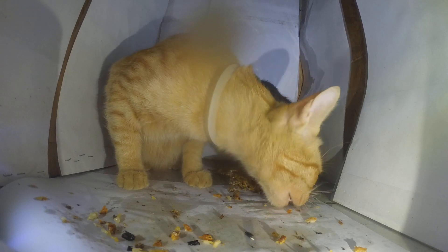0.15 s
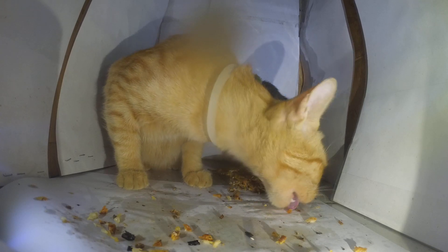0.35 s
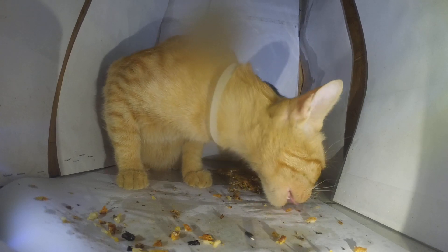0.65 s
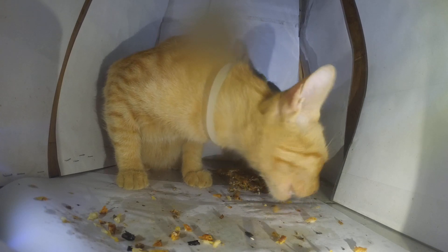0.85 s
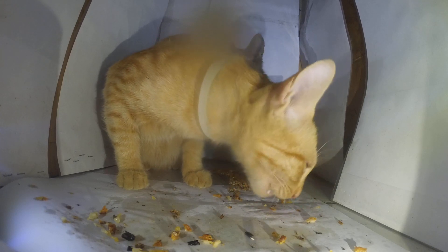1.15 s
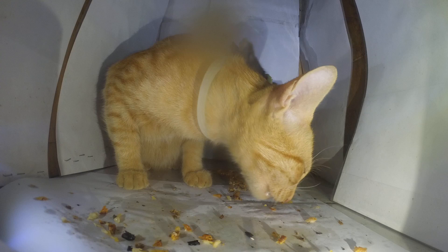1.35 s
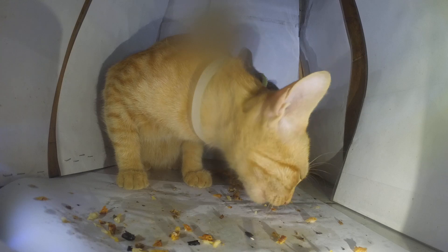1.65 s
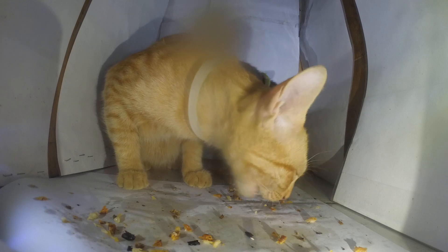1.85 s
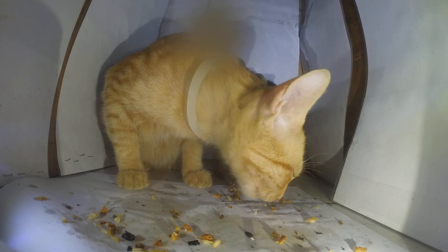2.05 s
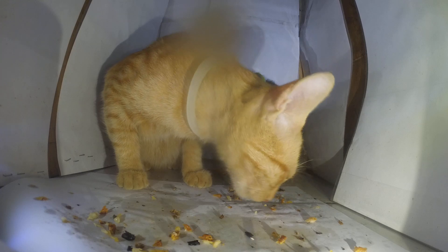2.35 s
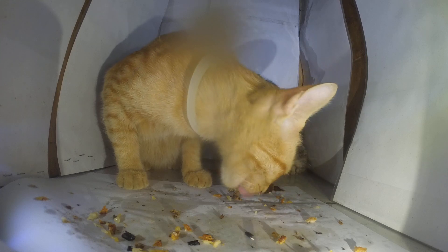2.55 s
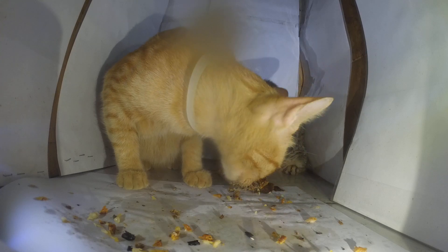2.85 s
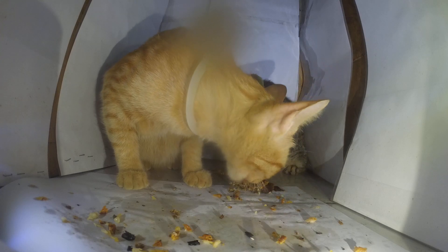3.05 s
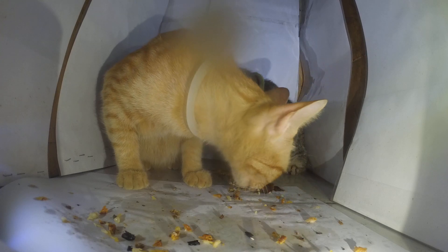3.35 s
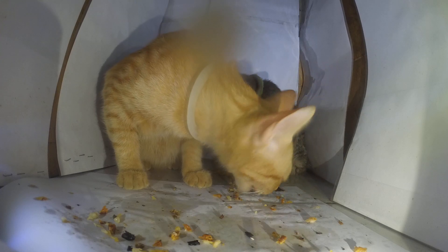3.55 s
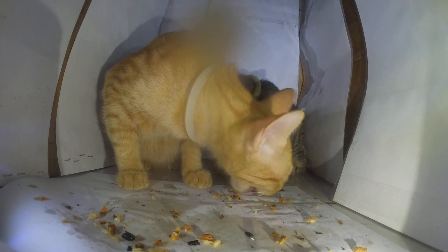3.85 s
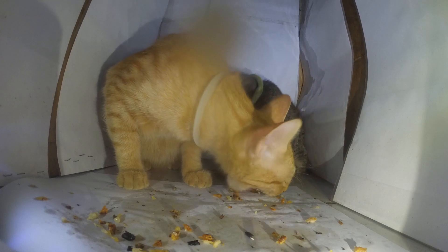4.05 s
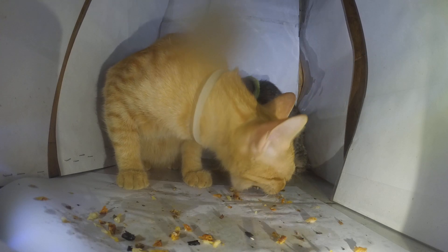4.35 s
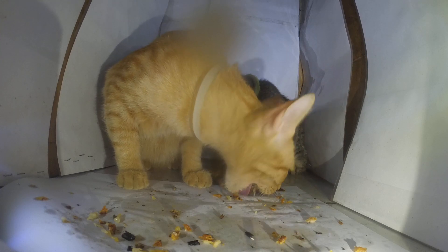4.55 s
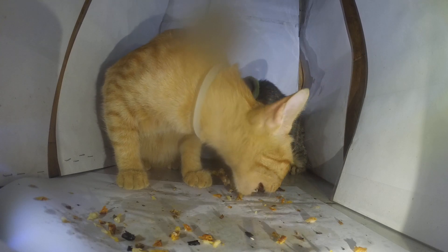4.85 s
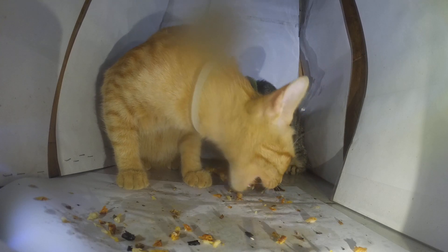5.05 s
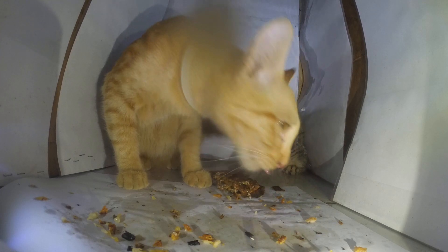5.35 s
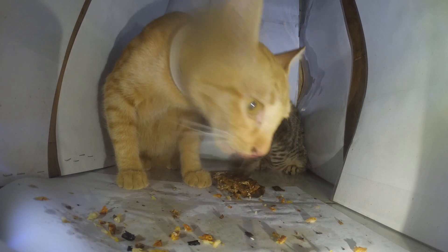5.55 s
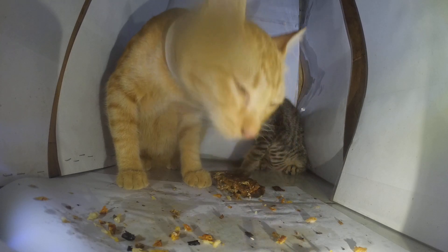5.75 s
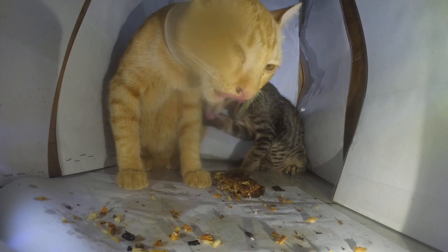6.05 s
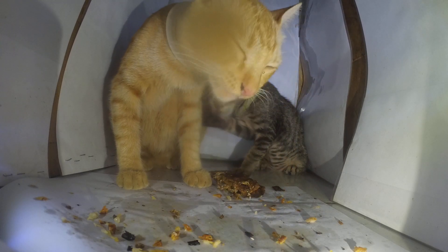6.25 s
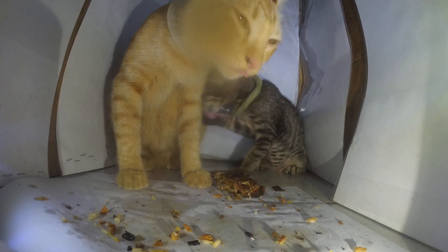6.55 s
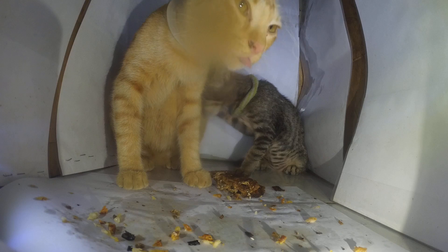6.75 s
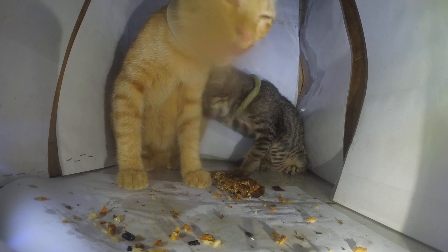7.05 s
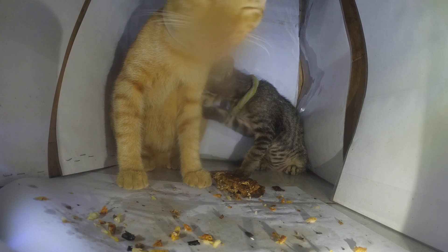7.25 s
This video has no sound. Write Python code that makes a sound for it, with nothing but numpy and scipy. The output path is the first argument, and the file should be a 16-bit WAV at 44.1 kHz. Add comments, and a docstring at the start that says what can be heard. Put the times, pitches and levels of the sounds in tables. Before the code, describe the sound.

A cat eats from the floor of a small box, close to a single microphone, with the same sound in both channels. From the start a deep hum, traffic rumble, faint hiss and high, rapidly throbbing insect shrill lie underneath. A crisp click snaps at about 0.5 seconds; from 1 to 3.5 seconds wet clicks and hollow smacks come in irregular clusters, busiest around 1.2 and 2 seconds, with short boxy reflections. A faster motor climbs in pitch until fading around 5.5 seconds, while a slower growl enters near 0.7, grows stronger and later sinks. Chewing thins after 3.5 seconds to tiny crackles and fine ticks, several between 5 and 5.5. Road roar swells to a peak around 5.5, then eases. At about 6.2 seconds a quick wet lick slides in pitch with a smack. Another low motor joins from 6 to 7.2, with sparse final clicks near 7.1.

```python
"""A cat eats from the floor of a small feeding box: short noise bursts and gliding tones click, smack and lick.
Motors growl past outside as stacks of sines: a slow one falls in pitch, a faster one speeds up, one joins late.
Shaped noise makes the road roar that swells behind them, and a faint hiss.
Insects shrill and throb high up as noise in sharp resonances; a very low hum stands under everything.
One microphone hears it all, so both channels are the same."""
import sys
import numpy as np
from scipy import signal
from scipy.fft import rfft, irfft
from scipy.io import wavfile
from scipy.ndimage import uniform_filter1d

SR = 44100
rng = np.random.default_rng(int(sys.argv[2]) if len(sys.argv) > 2 else 0)


def digitize_waveform(pressure):
    """Quantize a signal to 16-bit integers and store it at the path in sys.argv[1].

    Rows of a 2-D input are taken as channels; values are limited to [-1, 1].
    """
    field = np.atleast_2d(pressure).T
    bounded = np.clip(field, -1, 1)
    quanta = np.round(bounded * 32767).astype(np.int16)
    wavfile.write(sys.argv[1], SR, quanta)


N = 326781   # length in samples

# Very low hum. Each row: time in seconds, pitch in Hz, level in dB.
HUM_CURVE = [(0, 22.06, -45.5), (1.4, 22.54, -47), (3.2, 22.3, -51), (3.9, 21.54, -41), (5.7, 22.2, -61.5),
             (6.5, 21.92, -43), (6.85, 22.2, -44), (7.41, 22.25, -45)]
# Passing traffic. Each row: time in seconds, tyre roar in dB, rumble in dB, deep drone in dB.
ROAD_LEVELS = [(0, -67, -56, -48), (.9, -68.5, -56, -44.5), (1.45, -68, -56, -51.5), (2.0, -67, -56.5, -45),
               (2.55, -65.5, -54, -45.5), (3.2, -63.5, -54.5, -48), (4.1, -61, -48.5, -46.5),
               (4.6, -59.5, -53, -44), (5.1, -57.5, -53, -48.5), (5.5, -57, -54, -41),
               (5.75, -57, -53.5, -51), (6.15, -61.5, -52, -45), (6.8, -60.5, -53, -47),
               (7.41, -61.5, -49.5, -44)]
# Colour of the deep drone. Each row: frequency in Hz, relative strength in dB per Hz.
DRONE_COLOUR = [(3, -12), (10, -3), (30, -1.5), (60, 0), (100, -4), (140, -5.5), (200, -6.5), (240, -9),
                (300, -27)]
# Colour of the rumble. Each row: frequency in Hz, relative strength in dB per Hz.
RUMBLE_COLOUR = [(150, -7), (210, 0.5), (260, -1), (350, 2), (420, -0.5), (480, -9.5), (570, -7),
                 (700, -16.5), (900, -31)]
# Colour of the tyre roar. Each row: frequency in Hz, relative strength in dB per Hz.
TYRE_COLOUR = [(350, -29), (600, 0.5), (801, 0.5), (874, -3.5), (1090, 4), (1260, -1.5), (1510, -1),
               (2750, -11.5), (3180, -10), (4670, -17), (6000, -24.5), (7800, -44.5), (13200, -120)]
# Colour of the faint hiss. Each row: frequency in Hz, relative strength in dB per Hz.
HISS_COLOUR = [(1500, -20), (2200, -4.5), (5000, -3.5), (8000, -6), (10000, -8.5), (12500, -10),
               (15600, -14.5)]
# Insect songs. Each row: pitch in Hz, width in Hz, level in dB, throb depth in dB (below 0: swells as others dip).
INSECT_SONGS = [(6673, 360, -72.5, 2), (6977, 430, -67.5, 4.5), (7120, 1100, -72, -0.5),
                (7513, 180, -74, -1.5), (5810, 570, -82, 6), (8070, 3800, -89, 10)]
# Throb of the chorus. Each row: time in seconds, number of throbs so far.
THROB_COUNT = [(0, -.04), (5.3, 50.02), (5.7, 53.62), (7.41, 69.68)]
# Slow near motor. Each row: time in seconds, firing rate in Hz, then levels of orders 1, 2, 3, 4, 5 in dB.
# Order k is the tone at k times the firing rate.
NEAR_MOTOR_CURVE = [(0.7, 42.8, -70, -56, -66, -59, -63), (1.16, 40.74, -55, -49, -63, -52, -48),
                    (1.55, 39.35, -53, -57, -61, -56, -70), (1.8, 39.21, -51.5, -66, -60, -46, -49.5),
                    (2.1, 39.31, -63, -54, -58, -51.5, -51), (2.45, 39.5, -47, -54, -66, -68, -56),
                    (2.68, 39.85, -50, -51, -70, -67, -50.5), (2.84, 40.18, -52, -62, -74, -40.5, -45.5),
                    (3.1, 40.59, -47, -53.5, -52, -46, -52), (3.5, 41.02, -48, -45.5, -50, -41, -38),
                    (3.9, 40.54, -54, -42, -61, -40, -49.5), (4.2, 39.63, -43, -47, -46.5, -40, -48.5),
                    (4.45, 39.67, -43.5, -46.5, -57, -54, -36.5), (4.9, 39.54, -40, -45.5, -53, -42.5, -38),
                    (5.12, 39.2, -42, -46.5, -40, -55, -38), (5.35, 38.9, -45, -42.5, -48, -37.5, -43),
                    (5.75, 38.32, -41.5, -44.5, -54, -51, -39.5),
                    (6.15, 37.83, -44.5, -44.5, -50, -51, -46), (6.35, 37.9, -44, -55, -48.5, -45.5, -48),
                    (6.65, 37.3, -46, -57, -46, -54, -49), (6.95, 37.26, -47, -49, -48, -43.5, -41),
                    (7.1, 36.8, -54, -52, -34.5, -49, -49), (7.26, 35.4, -57, -53, -39.5, -47.5, -46),
                    (7.41, 36, -50, -41, -40, -39, -42.5)]
# High orders of the near motor. Each row: order (a plain number), level against the fifth order in dB.
NEAR_HIGH_ORDERS = [(6, -16), (7, -26), (8, -24), (9, -20), (10, -25), (11, -30), (14, -32), (19, -36)]
# Faster motor. Each row: time in seconds, firing rate in Hz, then levels of orders 2, 3, 4 in dB.
FAST_MOTOR_CURVE = [(0, 46.46, -56, -51, -44), (.3, 46.18, -51, -55, -55.5),
                    (.75, 46.06, -55.5, -48.5, -54.5), (1.1, 48.93, -52, -54, -59),
                    (1.4, 50.46, -51.5, -50, -55), (1.6, 51.6, -61, -52.5, -55), (2.0, 52.4, -47, -52, -56),
                    (2.4, 53.2, -46, -53.5, -57), (2.6, 54, -49.5, -41.5, -51),
                    (2.95, 55.3, -40, -53.5, -51), (3.25, 56.1, -58, -45.5, -60),
                    (3.55, 57.2, -46, -48, -66), (3.9, 57.6, -57, -50, -67), (4.3, 58.1, -52, -46.5, -72),
                    (4.7, 58.7, -49.5, -53, -48), (5.05, 59.13, -61, -50.5, -65),
                    (5.4, 59.3, -59, -56, -60)]
# High orders of the faster motor. Each row: order (a plain number), level against the fourth order in dB.
FAST_HIGH_ORDERS = [(7, -17), (8, -17), (10, -20)]
# Motor that joins late. Each row: time in seconds, firing rate in Hz, level in dB.
LATE_MOTOR_CURVE = [(6.0, 40.1, -54), (6.3, 40.13, -47), (6.9, 40.5, -38.5), (7.05, 39.23, -48),
                    (7.2, 40.6, -70)]
# Orders of the late motor. Each row: order (a plain number), level against the curve above in dB.
LATE_MOTOR_ORDERS = [(2, 0.5), (4, -14.5), (5, -17)]
# Mouth clicks. Each row: start in seconds, energy in dB, centre in Hz, width in octaves.
MOUTH_CLICKS = [(0.4313, -46, 5870, .4), (0.5414, -20, 5400, 1.03), (0.679, -38, 4000, 1.2),
                (0.9982, -36.5, 3900, 0.44), (1.261, -38, 4600, .95), (1.278, -41, 4480, 1.1),
                (1.305, -40, 4700, 0.94), (1.6344, -40, 4100, 1.4), (1.81, -39.5, 4900, .9),
                (1.9544, -44, 3950, 1.4), (1.9878, -27.5, 4450, 0.65), (2.023, -33.5, 3800, 1.2),
                (2.5112, -46, 3900, .9), (2.533, -40, 4200, 1.2), (3.007, -33, 3190, 1.35),
                (3.0188, -41, 4054, 1.07), (3.0554, -41, 3600, 0.68), (3.1187, -43, 3580, .75),
                (3.5204, -43, 3742, .95), (5.0582, -35, 4960, 1.1), (5.5403, -39, 5424, .45),
                (5.8086, -36, 3870, 1.33), (6.0088, -36, 3000, 1.7), (6.566, -39, 3000, 0.46),
                (7.0674, -37, 5463, 0.5), (7.1082, -41, 5300, .4)]
# Hollow smacks in the box. Each row: start in seconds, peak in dB, centre in Hz.
HOLLOW_SMACKS = [(0.5414, -59, 2210), (1.0001, -56, 1880), (1.1283, -53, 1868), (1.1957, -57, 1840),
                 (1.2448, -60, 1870), (1.2625, -49, 1720), (1.278, -56, 1620), (1.6566, -54, 1800),
                 (1.8846, -54.5, 1520), (1.955, -54, 1889), (1.9884, -45.5, 1750), (2.0228, -51.5, 1670),
                 (2.5117, -55, 1664), (2.7377, -57, 1870), (2.832, -54.5, 1850), (3.0076, -57, 1860),
                 (3.1807, -58, 1940), (3.1961, -54, 1830), (3.2091, -56, 1800), (3.2331, -57, 1933),
                 (3.5199, -51.5, 1962), (6.1724, -49, 1520)]
# Fine high ticks. Each row: start in seconds, peak in dB, centre in Hz.
HIGH_TICKS = [(0.5407, -59, 9820), (1.1255, -57, 9820), (1.8113, -61, 9200), (2.9596, -64, 9200),
              (3.3822, -63, 9140), (4.1782, -59, 10060), (4.2418, -61, 8927), (5.0575, -56, 8810),
              (5.1676, -59, 9600), (5.3657, -55, 8700), (5.4105, -57, 9270), (5.4241, -52, 9020),
              (6.1724, -62, 9100)]
# Wet licks. Each row: start in seconds, level in dB, start pitch in Hz, end pitch in Hz, glide time in seconds.
WET_LICKS = [(6.168, -42.5, 3766, 4116, 0.0065), (6.1695, -43, 6410, 6670, 0.0038),
             (6.170, -55, 5300, 5400, 0.0037), (6.2615, -45, 4210, 3050, 0.0093),
             (6.265, -56, 2760, 2470, 0.004), (6.290, -64, 3120, 3030, 0.0038)]

HISS_DB = -75.5
STROKE_HZ, STROKE_LIKENESS = 60.5, 0.27   # wing strokes per second; share of each stroke that repeats the last
CLICK_T60_S = 0.011   # time for the click's noise to fall by 60 dB
CUTOFF_HZ = 15600


def from_db(db):
    """Turn a level in dB into a plain gain."""
    return 10 ** (np.asarray(db) / 20)


def rms_one(x):
    """Scale a sound to an average strength (rms) of 1."""
    return x / np.sqrt(np.mean(x ** 2) + 1e-20)


def in_time(rows):
    """Draw straight lines between the rows, giving each column a value at every sample."""
    seconds, *columns = np.transpose(rows)
    t = np.arange(N) / SR
    return [np.interp(t, seconds, column) for column in columns]


def drift(rate_hz):
    """Slow random wandering with rms 1: smoothed noise, worked out at every 40th sample."""
    step = 40
    r = np.exp(-2 * np.pi * rate_hz * step / SR)
    noise = rng.standard_normal(N // step + 2002)
    slow = signal.lfilter([1], [1, -2 * r, r * r], noise)[2000:]   # skip the filter's start-up
    return np.interp(np.arange(N) / step, np.arange(len(slow)), rms_one(slow))


def coloured(spectrum):
    """Noise with the given balance of low and high, rms 1."""
    hz = np.fft.rfftfreq(N, 1 / SR) + 1   # the 1 avoids log(0)
    at_hz, db = np.transpose(spectrum)
    shape_db = np.interp(np.log(hz), np.log(at_hz), db, -80, -80)
    return rms_one(irfft(rfft(rng.standard_normal(N)) * from_db(shape_db), N))


def resonance(x, hz, width_hz):
    """Let through a band around one pitch, like something that rings there."""
    r = np.exp(-np.pi * width_hz / SR)
    top = (1 - r * r) / 2   # keeps the gain at the peak near 1
    return signal.lfilter([top, 0, -top], [1, -2 * r * np.cos(2 * np.pi * hz / SR), r * r], x)


def wavering_orders(rows, orders, upper, wobble, flutter_db, fading_db):
    """Sines at multiples of one moving pitch, each wavering in phase (wobble, radians) and level."""
    hz, *levels = in_time(rows)
    t, turn = np.arange(N) / SR, 2 * np.pi * np.cumsum(hz) / SR
    parts = list(zip(orders, levels))
    for order, db in upper:   # these follow the last column and also fade by themselves
        parts.append((order, levels[-1] + db + fading_db * drift(2.3)))
    tone = 0
    for order, db in parts:
        phase = order * turn + rng.uniform(0, 2 * np.pi) + wobble * drift(3)
        tone = tone + from_db(db + flutter_db * drift(7.4)) * np.sin(phase)
    fade_in = np.clip((t - rows[0][0] + 0.1) / 0.2, 0, 1)
    fade_out = np.clip((rows[-1][0] + 0.1 - t) / 0.1, 0, 1)
    return np.sqrt(2) * tone * fade_in * fade_out   # the root makes the levels rms


def low_hum():
    """A single very low sine whose pitch and level drift."""
    return wavering_orders(HUM_CURVE, (1,), [], wobble=0.087, flutter_db=1.5, fading_db=0)


def hiss(tyre_db):
    """Faint noise that lifts a little with the traffic."""
    swing_db = tyre_db - tyre_db.mean()
    return from_db(HISS_DB + 0.25 * swing_db) * coloured(HISS_COLOUR)


def road(tyre_db, rumble_db, drone_db):
    """Tyre roar, rumble and deep drone: three noises that swell and sink with the traffic."""
    roar = from_db(tyre_db) * coloured(TYRE_COLOUR)
    rumble = from_db(rumble_db) * coloured(RUMBLE_COLOUR)
    drone = from_db(drone_db) * coloured(DRONE_COLOUR)
    return roar + rumble + drone


def insects():
    """Each song is noise in a sharp wing resonance; one shared throb moves all their levels."""
    throb = np.cos(2 * np.pi * in_time(THROB_COUNT)[0])
    strength = 1 + 0.068 * drift(7.2)   # not every throb is equally deep
    hz_axis = np.fft.rfftfreq(N, 1 / SR)
    # each wing stroke partly repeats the last
    comb = 1 / (1 - STROKE_LIKENESS * np.exp(-2j * np.pi * hz_axis / STROKE_HZ))
    out = 0
    for hz, width_hz, db, depth_db in INSECT_SONGS:
        rasp = irfft(rfft(rng.standard_normal(N)) * comb, N)
        song = resonance(resonance(rasp, hz, width_hz), hz, width_hz)
        level_db = db + depth_db * throb * strength + 0.17 * drift(14)
        out = out + rms_one(song) * from_db(level_db)
    return out


def motors():
    """Engines sound at multiples of their firing rate; each tone wavers on its way through the street."""
    near = wavering_orders(NEAR_MOTOR_CURVE, (1, 2, 3, 4, 5), NEAR_HIGH_ORDERS,
                           wobble=0.076, flutter_db=2.12, fading_db=1.5)
    fast = wavering_orders(FAST_MOTOR_CURVE, (2, 3, 4), FAST_HIGH_ORDERS,
                           wobble=0.51, flutter_db=1.5, fading_db=4.0)
    late = wavering_orders(LATE_MOTOR_CURVE, (), LATE_MOTOR_ORDERS,
                           wobble=0.11, flutter_db=1.6, fading_db=0.8)
    return near + fast + late


def box(x, t60_s, wall_db):
    """The close walls give each mouth sound a short dense tail."""
    t = np.arange(2200) / SR
    tail = rng.standard_normal(len(t)) * from_db(-60 * t / t60_s)
    tail = tail * (t > 0.0015)   # the walls answer a moment later
    return x + from_db(wall_db) * signal.fftconvolve(x, tail / np.linalg.norm(tail))[:N]


def crackle(per_s, smallest_db):
    """Tiny wet clicks at random while the cat chews: single pulses, each ringing in one of six bands."""
    extra_db = 3.0 * np.minimum(rng.exponential(1, N), 2.5)
    pulses = from_db(smallest_db + extra_db) * (rng.random(N) < per_s / SR)   # sizes before the ringing
    band = rng.integers(0, 6, N)
    out = np.zeros(N)
    for k, hz in enumerate(np.geomspace(1800, 7500, 6)):
        out += resonance(pulses * (band == k) + 1e-18, hz, hz * 0.65)   # tiny offset keeps the filter fast
    return out


def licks():
    """A film of spit opens: a brief rough tone that slides in pitch and then rings out."""
    out, t = np.zeros(N), np.arange(2000) / SR
    for start_s, db, start_hz, end_hz, glide_s in WET_LICKS:
        hz = end_hz + (start_hz - end_hz) * np.clip(1 - t / glide_s, 0, 1)
        rise = np.clip(t / glide_s, 0, 1)
        fall = from_db(-60 * np.clip(t - glide_s, 0, 1) / 0.0086)
        rough = 1 + 0.32 * rms_one(uniform_filter1d(rng.standard_normal(len(t)), size=30))
        i = round(start_s * SR)
        out[i:i + len(t)] += from_db(db) * rise * fall * rough * np.sin(2 * np.pi * np.cumsum(hz) / SR)
    return out


def snaps(events, rise_s, t60_s, spread, ring):
    """A noise burst around the centre pitch with some pure ring in it; quick rise, quick fall."""
    out, t = np.zeros(N), np.arange(2000) / SR
    shape = (1 - np.exp(-(t / rise_s) ** 2)) * from_db(-60 * t / t60_s)
    for start_s, db, hz in events:
        width_hz = hz * spread
        burst = resonance(resonance(rng.standard_normal(len(t)), hz, width_hz), hz, width_hz)
        sound = shape * (ring * np.sin(2 * np.pi * hz * t) + rms_one(burst))
        i = round(start_s * SR)
        out[i:i + len(t)] += from_db(db) * sound / np.abs(sound).max()
    return out


def clicks():
    """A sharp snap with a little trailing noise, heard through the band the mouth lets out."""
    out, t = np.zeros(N), np.arange(2000) / SR
    for start_s, db, hz, octaves in MOUTH_CLICKS:
        snap = 0.84 * rng.standard_normal(len(t)) * from_db(-60 * t / CLICK_T60_S)
        snap[0] = 1
        edges_hz = hz * 2 ** (octaves * np.array([-0.5, 0.5]))
        band = signal.butter(2, edges_hz, "band", fs=SR, output="sos")
        snap = signal.sosfilt(band, snap)
        i = round(start_s * SR)
        out[i:i + len(t)] += from_db(db) * snap / np.linalg.norm(snap)
    return out


def eating_cat():
    """All mouth sounds together, with the tail of the box around them."""
    smacks = snaps(HOLLOW_SMACKS, rise_s=0.00064, t60_s=0.02, spread=0.15, ring=1.5)
    ticks = snaps(HIGH_TICKS, rise_s=0.00054, t60_s=0.006, spread=0.47, ring=0.21)
    mouth = clicks() + smacks + ticks + licks() + crackle(per_s=16, smallest_db=-46)
    return box(mouth, t60_s=0.052, wall_db=-9.5)


def scene():
    """Street, insects and the eating cat added up at one point, the same in both channels."""
    tyre_db, rumble_db, drone_db = in_time(ROAD_LEVELS)
    background = low_hum() + hiss(tyre_db) + road(tyre_db, rumble_db, drone_db) + insects()
    mono = background + motors() + eating_cat()
    return np.array([mono, mono])


def record(dry):
    """Cut the top steeply: from the cutoff up, everything is at least 50 dB down."""
    return signal.sosfilt(signal.cheby2(22, 50, CUTOFF_HZ, fs=SR, output="sos"), dry)


dry = scene()
out = record(dry)
digitize_waveform(out)
```